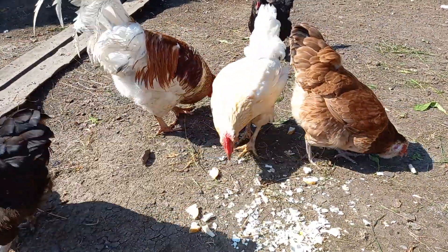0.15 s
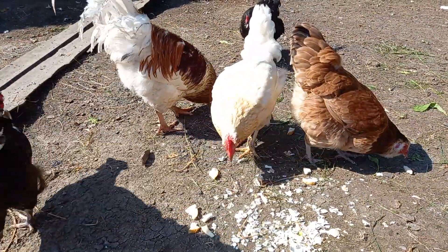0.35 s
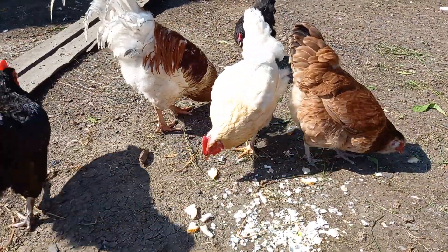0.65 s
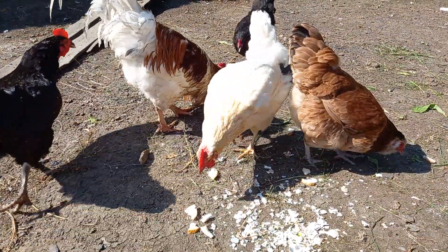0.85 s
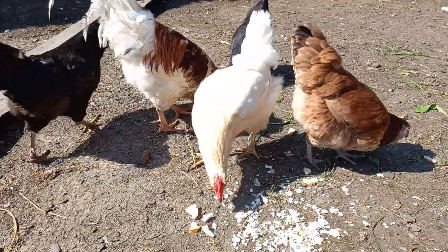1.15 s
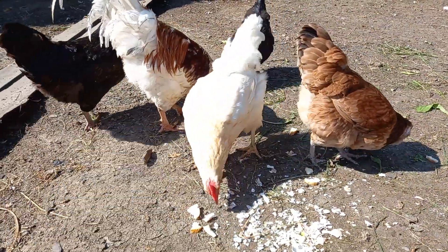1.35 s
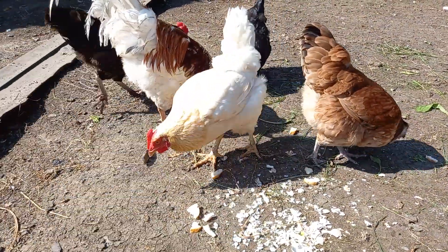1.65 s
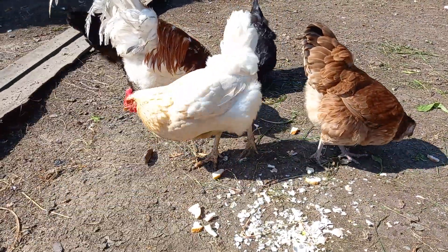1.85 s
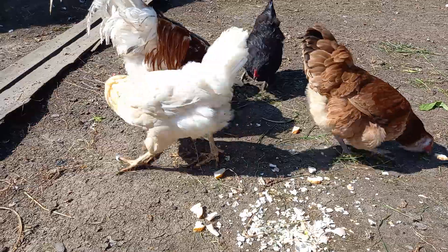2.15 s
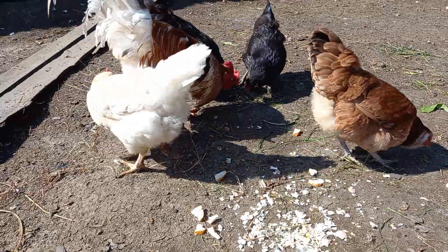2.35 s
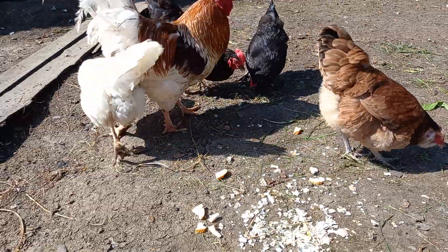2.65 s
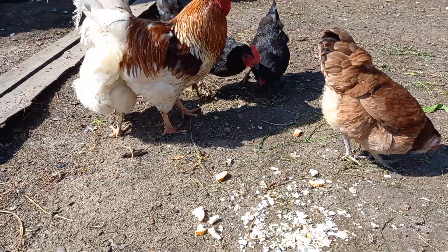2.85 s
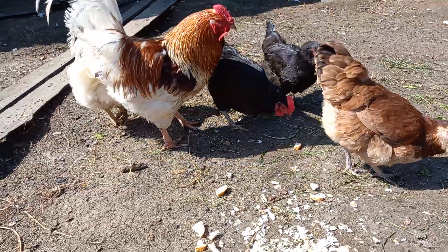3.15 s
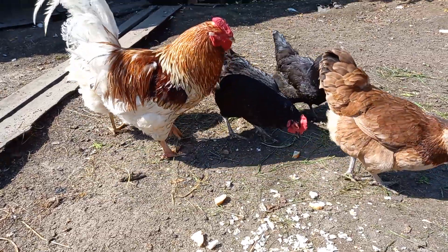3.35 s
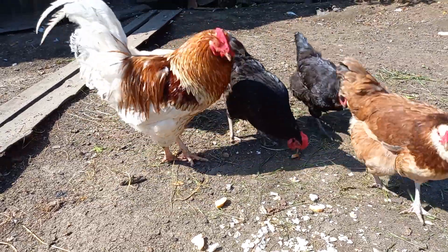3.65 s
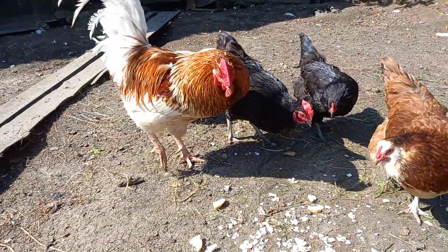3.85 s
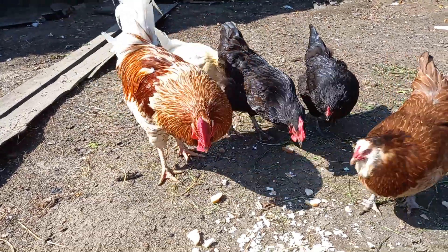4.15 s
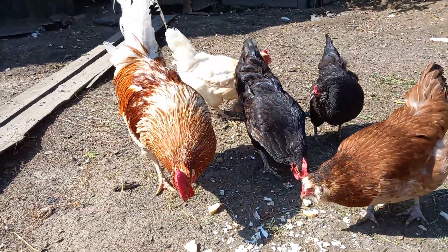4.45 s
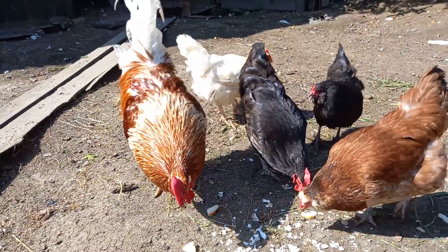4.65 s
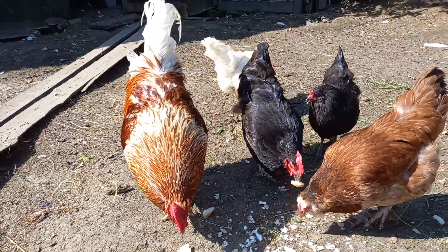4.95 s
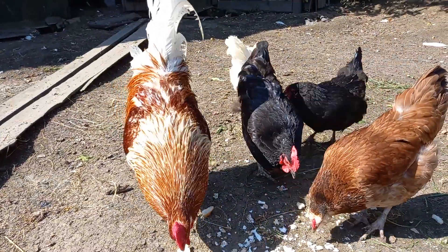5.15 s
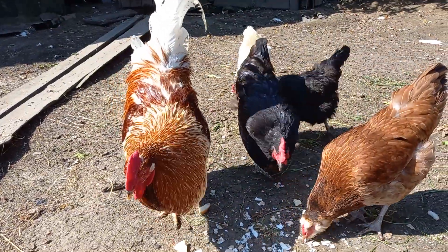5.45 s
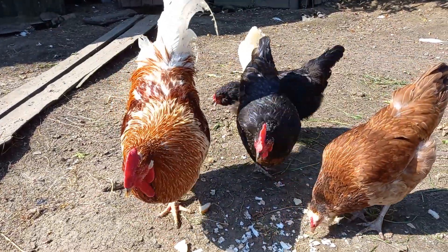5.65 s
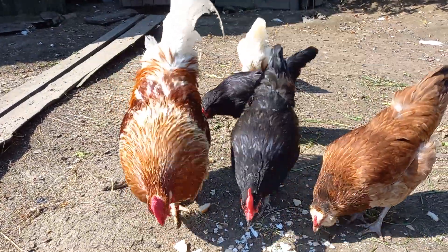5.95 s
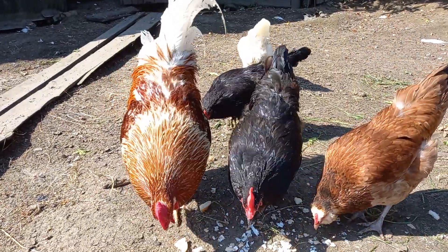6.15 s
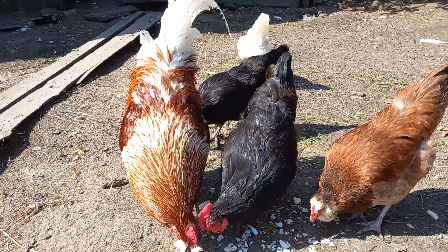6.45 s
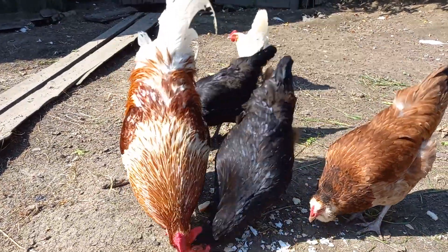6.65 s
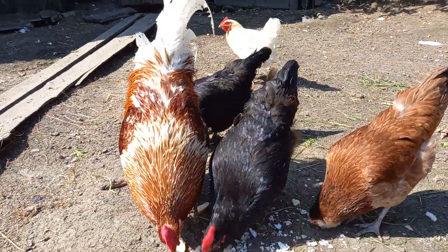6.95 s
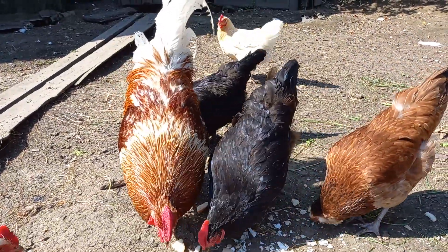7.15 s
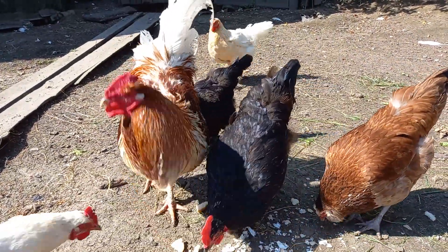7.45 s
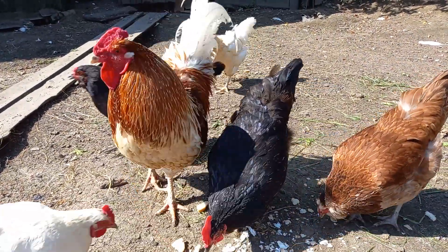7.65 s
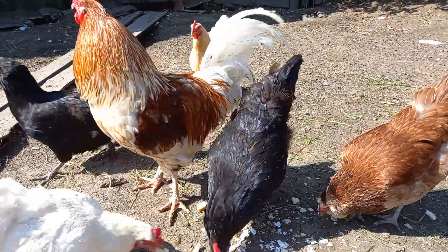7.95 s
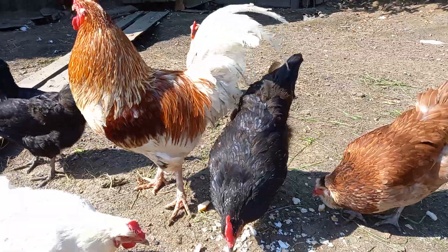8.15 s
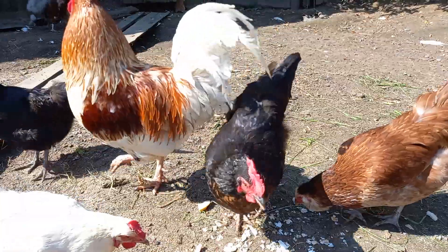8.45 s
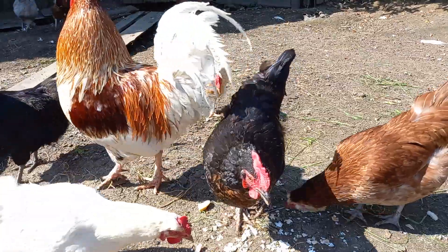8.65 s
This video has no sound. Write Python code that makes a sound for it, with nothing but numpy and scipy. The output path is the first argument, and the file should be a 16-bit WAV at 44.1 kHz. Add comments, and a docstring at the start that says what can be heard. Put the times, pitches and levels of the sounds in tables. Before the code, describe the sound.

Chickens feed close to the microphones in a quiet farmyard with a slight echo. Throughout, beaks tick irregularly on hard dirt and claws and feathers rustle softly over grit, while distant songbirds whistle faint, mostly falling notes. From 0.5 to 1.9 seconds a rooster gives five short, hollow, falling clucks. Around 3 seconds a hen makes three thin whines. The rooster clucks again from 3.3 to 6.6 seconds, about three times a second at first, among a few dull thuds. A nearby hen croons in a low, wavering voice from 4.2 to 4.6 seconds and again from 5.5 to 6.2. A gust of wind rumbles on the microphones from 7 to 7.9 seconds. At about 7.5 the rooster gives two quick, hoarse squawks, slightly to the left, then a rough, throbbing growl from 7.8 to 8.6 seconds, after which everything fades quickly.

```python
"""Rooster and hens in a farmyard

Close by, a rooster gives short hollow clucks (falling tones), two hoarse squawks (air through his
open throat) and a long throbbing growl. Hens croon with wavering voices and peck at crumbs on hard
dirt while claws scuff the grit. A songbird whistles far off, sheds and fences echo the birds,
and a gust of wind brushes the two spaced microphones."""
import sys
import numpy as np
from scipy import signal
from scipy.fft import rfft, irfft, next_fast_len
from scipy.io import wavfile
from scipy.ndimage import uniform_filter1d, map_coordinates

SR = 44100
rng = np.random.default_rng(int(sys.argv[2]) if len(sys.argv) > 2 else 0)


def wrap_up_sound(samples):
    """Save the sound to the file named by the first command line argument, as 16-bit audio."""
    columns = np.atleast_2d(samples).T
    # keep every value between -1 and 1, then stretch to whole-number steps
    tamed = np.clip(columns, -1, 1)
    steps = np.round(tamed * 32767).astype(np.int16)
    wavfile.write(sys.argv[1], SR, steps)


N = 388521

# rooster clucks (t/s, length/s, starting f/Hz, level/dB, overtone/dB, half pitch/dB, after-note/dB)
CLUCKS = [(0.528, 0.02, 497.3, -6.5, -28, -20.5, -17), (0.807, 0.032, 531.5, -5.5, -29.5, -21.5, -16.5),
          (1.161, 0.026, 500.5, -9.5, -26, -19, -8), (1.584, 0.026, 492.7, -8, -23.5, -18.5, -16.5),
          (1.867, 0.021, 477.4, -8, -26, -14, -14.5), (3.291, 0.014, 470, -10, -6, -5.5, -18.5),
          (3.725, 0.013, 509, -12, -11.5, -0.5, -15), (4.042, 0.019, 481, -8, -10, -45, -21),
          (4.39, 0.017, 482, -4, -10.5, -20, -38), (4.821, 0.02, 511, -7, -29, -9.5, -24),
          (5.095, 0.024, 504, -7, -34, -10, -26), (5.341, 0.033, 537.4, -6.5, -32, -22.5, -54),
          (6.297, 0.026, 490.5, -6, -38, -25, -29), (6.58, 0.026, 501.4, -5.5, -32, -15.5, -48)]
# rooster squawks (t/s, hold/s, level/dB, extra for the beak hiss/dB)
SQUAWKS = [(7.545, 0.021, -10, -17.5), (7.66, 0.037, -11, -11.5)]
# where his wide-open throat rings (f/Hz, width/Hz, level/dB)
THROAT_RINGS = [(553, 50, -10), (1180, 110, 13.5), (1670, 110, -2.5), (2500, 230, -10)]
# where his open beak rings (f/Hz, width/Hz, level/dB)
ROOSTER_BEAK_RINGS = [(4040, 610, 1), (5730, 120, -2), (11000, 1000, -16)]
# course of the growl (t/s, f/Hz, level/dB, roughness from 0 to 1, windpipe ring/dB)
GROWL = [(7.839, 363.4, -13.5, 0.09, -41), (7.92, 422.7, -18, 0.13, -65), (8.02, 466, -15.5, 0.47, -38),
         (8.129, 503.4, -17, 0.78, -21.5), (8.22, 517.4, -17, 0.74, -23.5), (8.319, 477.4, -15, 0.84, -33),
         (8.46, 495.6, -14.5, 0.98, -18.5), (8.58, 505.7, -16, 0.2, -24.5), (8.61, 420, -17.5, 0.2, -41),
         (8.645, 382, -17.5, 0.42, -54)]
# tone colour of the growl's breath (f/Hz, level/dB)
BREATH_COLOUR = [(900, -14), (1400, 1), (1750, -3), (2300, -2), (2650, -6), (2950, -2), (3600, -20),
                 (4700, -20), (5600, -14), (9000, -30)]
# how much louder the squawks and growl are on the left (f/Hz, left minus right/dB)
ROOSTER_PAN = [(400, 5.5), (800, -3), (1300, 8.5), (2200, 5.5), (8000, 2.5), (15000, 11)]
# how far their waves are ahead on the left (f/Hz, lead/radians)
ROOSTER_LEAD = [(300, 0.14), (780, 0.62), (1210, 3.43), (1550, 2.1), (2200, 1.07), (4900, 7.76),
                (8400, 13.6), (16000, 26)]
# near hen's long calls (beak opening/dB, roughness/dB, rows of (t/s, f/Hz, level/dB, low overtones/dB))
LONG_CALLS = [(-11.5, -17, [(4.188, 255, -30, -1.5), (4.204, 283.2, -22, 2.5), (4.256, 261.8, -25.5, -0.5),
              (4.296, 284.5, -28, 4), (4.37, 268.7, -21.5, 3), (4.43, 252, -24, -2.5),
              (4.465, 214, -21, -2), (4.475, 218, -46, -3)]), (-5.5, -25, [(5.565, 302, -48, 9),
              (5.61, 318.8, -35, 0.5), (5.654, 291.7, -27.5, -1), (5.69, 272.6, -22.5, -1.5),
              (5.72, 243.5, -25, -4.5), (5.78, 262.6, -22, -3), (5.855, 263.4, -18.5, -7.5),
              (5.884, 236, -26, -5), (5.897, 216, -45, -5)])]
# her short calls
# (t/s, length/s, first f/Hz, last f/Hz, level/dB, low overtones/dB, beak opening/dB, roughness/dB)
SHORT_CALLS = [(4.557, 0.0535, 306, 239.4, -24.5, 1, -14, -4.5),
               (5.517, 0.048, 262.3, 285, -28.5, 1, -14, -10),
               (6.006, 0.062, 271.6, 291.4, -20, -2.5, -0.5, -14),
               (6.165, 0.067, 325, 282, -26.5, 3, -3.5, -7.5)]
# where her open beak rings (f/Hz, width/Hz, boost/dB)
HEN_BEAK_RINGS = [(1723, 67, 12.5), (2525, 146, 16)]
# thin-voiced hen, one list for each call (t/s, f/Hz, level/dB)
WHINES = [
    [(2.883, 490, -37), (2.9, 391, -35), (2.92, 399, -45), (2.95, 382, -57)],
    [(3.05, 730, -31), (3.08, 783, -37), (3.11, 526, -29.5), (3.165, 518, -31), (3.185, 554, -44),
     (3.24, 496, -49)],
    [(3.285, 466, -21), (3.3, 407, -25.5), (3.33, 413, -42), (3.375, 432, -38.5)],
]
# beaks and claws hitting grit (t/s, level/dB, extra for the duller body of the tick/dB)
PECKS = [(0.0283, -29.5, -4), (0.11, -30, -8), (0.395, -35, 2.5), (0.5696, -24.5, -9.5),
         (0.6938, -26.5, -8), (1.132, -18.5, -18), (1.4287, -37, -23), (1.588, -27, -28), (1.885, -31, -14),
         (2.1736, -16.5, -10.5), (2.211, -25, -24.5), (2.2216, -25, -38), (2.24, -23.5, -32),
         (2.3433, -24.5, -20), (2.6449, -28, -15), (3.6971, -19, -4), (3.7116, -16, -3), (3.732, -20, -1),
         (4.4358, -32.5, 9.5), (4.8465, -24.5, -10), (4.8652, -27, -2), (4.9194, -30, -20),
         (5.2515, -25.5, -11.5), (5.276, -25, -16.5), (5.987, -27.5, -31), (6.746, -33.5, -3.5),
         (6.8537, -17.5, -27), (6.8805, -19.5, -12.5), (6.995, -32.5, -13), (7.0537, -13, -9.5),
         (7.2568, -24, -20.5), (7.31, -23, -10.5), (7.4644, -19, -13.5), (7.874, -25, -0.5)]
# short, dull, low thuds: knocks on the dirt, and the low half-pitch tails of two rooster clucks
# (t/s, level/dB, f/Hz)
THUDS = [(0.148, -34, 473), (3.042, -26, 500), (3.734, -12.5, 266), (4.058, -14, 273), (4.443, -19.5, 131),
         (5.222, -23, 145), (5.923, -30, 328), (6.077, -20.5, 268), (6.248, -28, 307),
         (7.048, -25.5, 141.5)]
# feet and feathers moving over the grit (t/s, level/dB)
SHUFFLE = [(0.1, -50), (0.8, -48), (1.3, -56), (2, -56), (2.25, -47.5), (2.6, -56.5), (3.3, -50),
           (4.2, -47), (4.65, -61), (5.2, -59), (5.8, -48.5), (6.5, -58.5), (7, -45), (7.7, -39),
           (8.3, -49.5)]
# tone colour of grit (f/Hz, level/dB)
GRIT_COLOUR = [(2000, -26), (4500, -5.5), (7500, -10), (10500, -0.5), (14000, -0.5), (15700, -4),
               (16100, -40), (17000, -24)]
# tone colour of straw and feathers (f/Hz, level/dB)
STRAW_COLOUR = [(300, 4), (700, 3.5), (1500, -8), (3500, -7), (6000, -18), (9000, -18)]
# songbird notes (t/s, length/s, first f/Hz, last f/Hz, bend: 1 straight or 4 held then steep, level/dB)
SONG = [(0.029, 0.17, 4850, 3160, 3.9, -44), (.34, 0.11, 3050, 4110, 3.3, -50.5),
        (0.508, 0.074, 3970, 3890, 0.84, -49), (.64, .14, 4800, 4160, 0.92, -47.5),
        (0.719, 0.16, 3920, 3010, 1.1, -48.5), (.9, 0.16, 4930, 2840, 3.7, -49.5),
        (1.039, 0.09, 4600, 2450, 3.9, -48), (1.158, .15, 4980, 2600, 4, -49),
        (1.47, 0.16, 4890, 2590, 4, -45), (1.83, 0.16, 3800, 2580, 3.2, -63.5),
        (2.01, 0.066, 3500, 2900, 1.2, -56.5), (2.25, 0.041, 3000, 2400, 1, -51),
        (2.44, 0.062, 3300, 3780, 1.4, -52.5), (2.66, 0.115, 3760, 3730, 0.81, -63),
        (3, 0.14, 4030, 2470, 2.8, -60), (3.201, 0.18, 4070, 3140, 0.98, -56),
        (3.5, 0.1, 4020, 2530, 2.5, -59), (4.08, 0.037, 2890, 2690, 1.4, -40.5),
        (4.239, .08, 3950, 3060, 0.92, -53), (4.499, 0.043, 3320, 3130, 1.2, -47.5),
        (5.02, 0.039, 3093, 3126, 1.2, -48), (5.22, 0.086, 3660, 4280, 0.65, -58.5),
        (5.35, 0.15, 4420, 5450, 2.5, -53), (5.55, 0.11, 3050, 4100, 2.9, -50),
        (5.701, 0.11, 4110, 3800, .3, -49), (5.911, .2, 4060, 2863, 1.26, -48)]
# strength of the wind (t/s, level/dB)
GUST = [(0.1, -48), (1.4, -49), (3.3, -48.5), (4.6, -45.5), (6.8, -51), (6.95, -39), (7.3, -29),
        (7.8, -29.5), (7.95, -54.5), (8.7, -56)]
# tone colour of the wind's rumble (f/Hz, level/dB)
RUMBLE_COLOUR = [(25, -20), (50, -15.5), (80, 4), (140, -1), (250, -2.5), (500, -39)]
# tone colour of the yard at rest (f/Hz, level/dB)
HUSH_COLOUR = [(35, -20), (60, -1.5), (323, 0), (1340, -17.5), (3760, -22.5), (8320, -33), (11500, -21.5),
               (16000, -40.5)]
# how long the yard's echo takes to fade by 60 dB (f/Hz, t/s)
ECHO_TIMES = [(200, 0.38), (500, 0.24), (1300, 0.21), (4000, 0.24), (10000, 0.047)]


def rooster_clucks():
    """Each cluck is a falling, almost pure tone with a hard start; a weaker after-note trails it."""
    fall_hz_per_s = 3020
    out, t = np.zeros(N + SR), np.arange(SR // 8) / SR
    flutter = wobble(90)
    puff = filtered(rng.standard_normal(N), rings([(736, 108, 24.3), (1885, 190, 5)]))
    beak_breath = unit(filtered(rng.standard_normal(N), rings([(2640, 620, 5), (4730, 990, -3.5)])))
    for s, length, first_hz, db, over_db, half_db, after_db in CLUCKS:
        start = round(s * SR - 90)
        span = slice(start, start + len(t))
        last_hz = first_hz - fall_hz_per_s * length
        hz = np.interp(t, [0, .006, length, length + .074],
                       [1.286 * first_hz, first_hz, .981 * last_hz, 1.093 * last_hz])
        phase = phase_of(hz)
        main_times = [0, .005, .011, length, length + .004, length + .009]
        after_times = [length, length + .004, length + .026, length + .034, .12]
        main = amp(np.interp(t, main_times, [-24, -5, 0, -3, -14, -60]))
        after = amp(after_db + np.interp(t, after_times, [-32, 7, 4.5, -13, -34.5]))
        voice = main * (np.sin(phase) + amp(over_db - 2 - 9 * t / length) * np.sin(2 * phase + 1))
        voice += after * np.sin(phase + 2.2)  # the voice membrane restarts out of step
        late = np.clip(t / length, 0, 1) ** 2  # every second cycle weakens as the note ends
        voice += amp(half_db) * late * (main + .58 * after) * np.sin(phase / 2)
        voice += main * (amp(-3.5 + .87 * over_db) * puff[span] + amp(-35.5) * beak_breath[span])
        out[span] += amp(db + flutter[span]) * voice
    return out[:N]


def rooster_squawks():
    """Ragged bursts of air rush through the wide-open throat and beak."""
    out = np.zeros(N)
    air = rng.standard_normal((2, N)) * amp(1.2 * wobble(300))
    throat = unit(filtered(air[0], rings(THROAT_RINGS)))
    beak = unit(filtered(air[1], rings(ROOSTER_BEAK_RINGS)))
    for s, hold, db, hiss_db in SQUAWKS:
        span, (swell_db, gate) = call_curves(swell(s, rise_s=.013, hold_s=hold, fall_s=.029))
        out[span] += gate * amp(db + swell_db) * (throat[span] + amp(hiss_db) * beak[span])
    return out


def rooster_growl():
    """An uneven throb chops up the voice, along with its rasp, windpipe ring and hoarse breath."""
    throb_hz, burst_db, burst_s = 56, 10.5, .0067
    hz, db, roughness, ring_db, _ = curves(GROWL)
    start, end = GROWL[0][0], GROWL[-1][0]
    swell_db, gate = curves(swell(start, rise_s=.033, hold_s=end - start, fall_s=.041))
    beat = phase_of(throb_hz * (1 + .32 * wobble(22)))
    throb = unit((.56 + .5 * np.cos(beat)) ** 1.2 * amp(2.2 * wobble(40)))
    phase = phase_of(hz * (1 + .02 * wobble(150)))
    # as the voice roughens, its overtone gives way to the low tone and the rasp
    low_tone = amp(db - 2.5) * roughness * (.58 + .098 * throb) * np.sin(phase)
    overtone = amp(db) * np.sqrt(1 - roughness) * (.43 + .73 * throb) * np.sin(2 * phase)
    blip = np.sin(phase_of(1.22 * hz * (1 + .084 * np.sin(beat) + .0605 * wobble(60))))  # rises each throb
    rasp = np.sqrt(roughness) * unit(throb * (blip + .4 * noise_band(1.65 * hz, 380)))
    windpipe = noise_band(np.clip(4.05 * hz, 1900, 2030), 150) + amp(-19) * noise_band(3050, 244)
    ring = amp(ring_db) * unit((.83 + .31 * throb) * windpipe)
    breath = unit((1.5 + throb) * coloured(rng.standard_normal(N), BREATH_COLOUR))
    burst = np.exp(-np.abs(np.arange(N) / SR - start) / burst_s)  # extra breath as the growl breaks out
    breath *= amp(-16.5 + burst_db * burst)
    return gate * amp(swell_db) * (np.sqrt(2) * (low_tone + overtone) + amp(db) * (rasp + breath) + ring)


def hen_croon():
    """The near hen's voice pulses at a wavering pitch; its upper overtones grow as her beak opens."""
    muffle_above_hz = 1157
    out, multiple = np.zeros(N), np.arange(2, 12)[:, None]  # overtones are multiples of the pitch
    waver = .017 * wobble(120) + .0131 * wobble(35)
    flutter = wobble(60)
    breath, rasp = noise_band(2100, 1780), noise_band(750, 540)
    drift = np.array([wobble(45) for _ in multiple])
    for open_db, rough_db, rows in LONG_CALLS + short_hen_calls():
        span, (hz, db, low_db, gate) = call_curves(rows)
        phase, overtone_hz = phase_of(hz * (1 + waver[span])), multiple * hz
        upper = np.clip((overtone_hz - 880) / 120, 0, 1)  # 1 above the throat's lowest ring
        muffled = np.clip((overtone_hz - muffle_above_hz) / 150, 0, 1)
        ring_db = sum(boost_db / (1 + ((overtone_hz - centre) / width) ** 2)
                      for centre, width, boost_db in HEN_BEAK_RINGS)
        low_gains = (1 - upper) * amp(low_db - 4 * (multiple - 2))
        high_gains = upper * amp(-16 - 6 * (multiple - 4.5) + open_db * muffled + ring_db)
        gains = (low_gains + high_gains) * amp(3 * drift[:, span])
        voice = np.cos(phase) + np.sum(gains * np.cos(multiple * (phase - .61)), axis=0)
        air = amp(open_db - 37) * breath[span] + amp(rough_db) * rasp[span]
        voice += (1 + np.cos(phase)) * air  # air escapes once a cycle
        out[span] += np.sqrt(2) * gate * amp(db + .57 * flutter[span]) * voice
    return out


def short_hen_calls():
    """Her short calls, laid out like LONG_CALLS: the pitch slides while the level swells and fades."""
    calls = []
    for s, length, first_hz, last_hz, db, low_db, open_db, rough_db in SHORT_CALLS:
        rise, hold, fall = .2 * length, .57 * length, .23 * length
        rows = [(t, first_hz + (last_hz - first_hz) * (t - s) / length, db + swell_db, low_db)
                for t, swell_db in swell(s + rise, rise, hold, fall, edge_db=-21.5)]
        calls.append((open_db, rough_db, rows))
    return calls


def hen_whine():
    """A thin, whistle-like voice; its overtones lead at low pitch and fade as the pitch climbs."""
    fade_above_hz, fade_db_per_hz = 413, .47
    out, waver, flutter = np.zeros(N), wobble(100), wobble(70)
    for rows in WHINES:
        span, (hz, db, gate) = call_curves(rows)
        over_db = db + 10.5 - fade_db_per_hz * np.clip(hz - fade_above_hz, 0, None)
        phase = phase_of(hz * (1 + .0454 * waver[span]))
        tone = amp(db) * np.sin(phase) + amp(over_db) * (np.sin(2 * phase) + amp(-27) * np.sin(3 * phase))
        out[span] += np.sqrt(2) * gate * amp(2.5 * flutter[span]) * tone
    return out


def pecks():
    """A beak or claw makes a sharp tick inside a short scuff of grit, which lasts longer when loud."""
    bright, body = np.zeros((2, 2, N + SR))
    t = np.arange(SR // 16) / SR - .006
    for s, db, body_db in PECKS:
        shared_noise, side_noise, chance = rng.standard_normal((3, len(t)))
        lag_samples, pan_db = 8 * chance[0], 2 + 3 * chance[1]  # each peck has its own place
        scuff = np.exp(-np.abs(t) / np.where(t < 0, .0015, .0094 + .0033 * amp(db + 6)))
        grains = amp(8.8 * uniform_filter1d(chance, size=15))
        shape = np.exp(-np.abs(t) / .00027) + .3 * scuff * grains
        for side, sign in enumerate([1, -1]):
            start = round((s + t[0]) * SR + sign * lag_samples)
            tick = amp(db + sign * pan_db / 2) * shape * (shared_noise + .18 * sign * side_noise)
            bright[side, start:start + len(t)] += tick
            body[side, start:start + len(t)] += amp(body_db) * tick
    bright = amp(4.5) * coloured(bright[:, :N], GRIT_COLOUR)
    return bright + filtered(body[:, :N], rings([(1680, 2200, 13), (3270, 2600, 7.8)]))


def thuds_and_gulps():
    """A dull, low thud rings for a cycle or two; the rooster's soft gulp before each cluck sounds alike."""
    gulp_ahead_s = .056
    out, t, gulps = np.zeros(N + SR), np.arange(SR // 16) / SR, []
    for s, _, hz, db, *_ in CLUCKS:
        size, coin = rng.standard_normal(2)
        gulps.append((s - gulp_ahead_s, db - 23.5 + 3 * size, hz / 2 if coin > 0 else hz))
    for s, db, hz in THUDS + gulps:
        start, cycles = round(s * SR - 40), t * hz
        shape = np.exp(-cycles / 1.25) * (1 - np.exp(-cycles / .46))
        out[start:start + len(t)] += amp(db + 9) * shape * np.sin(2 * np.pi * cycles)
    return out[:N]


def shuffle():
    """Feet push clumps of grit that fizz and crackle; straw and feathers rustle along."""
    snaps_per_s = 60
    fizz_db, _ = curves(SHUFFLE)
    clump = wobble(11)
    snaps = (rng.random(N) < snaps_per_s / SR) * rng.exponential(2.9, N)
    crackle = 1 + signal.fftconvolve(snaps, np.exp(-np.abs(np.arange(-200, 201)) / 35), "same")
    fizz = unit(amp(2.5 * clump) * crackle * stereo_noise(GRIT_COLOUR, alike=.15))
    rustle = unit(amp(2 * clump + 2.5 * wobble(30)) * stereo_noise(STRAW_COLOUR, alike=.1))
    return amp(fizz_db + np.array([[1.2], [-1.2]])) * fizz + amp(-54 + 1.2 * (fizz_db + 55.5)) * rustle


def songbirds():
    """Gliding whistles that fray and swell the farther they slide; a far wall repeats them faintly."""
    edge_s, rest_s = .012, .014  # fade at both ends of a note; time spent on its last pitch
    wall_s, wall_db = .11, -16.5
    out, flutter, fray = np.zeros(N), wobble(80), wobble(200)
    for s, length, first_hz, last_hz, bend, db in SONG + twitter_notes():
        span = slice(round(s * SR), round((s + length) * SR))
        t = np.arange(span.stop - span.start) / SR
        hz = first_hz + (last_hz - first_hz) * np.clip(t / (length - rest_s), 0, 1) ** bend
        octaves = np.abs(np.log2(hz / first_hz))
        whistle = np.sqrt(2) * np.sin(phase_of(hz * (1 + (.0078 + .025 * octaves) * fray[span])))
        gate = np.clip(np.minimum(t, length - t) / edge_s, 0, 1)
        out[span] += gate * amp(db + 3.5 * octaves + 2.9 * flutter[span]) * whistle
    return out + amp(wall_db) * np.roll(out, round(wall_s * SR))


def twitter_notes(count=55, typical_hz=3690):
    """Rows like SONG for birds farther off: faint, mostly falling notes at random until the growl."""
    times, chances = rng.uniform(0, GROWL[0][0], count), rng.standard_normal((count, 3))
    notes = []
    for s, (pitch, slide, size) in zip(times, chances):
        first_hz = typical_hz * np.exp(.12 * pitch)
        notes.append((s, .07, first_hz, first_hz * np.exp(.11 * slide - .12), 1.5, -61.5 + 1.9 * size))
    return notes


def wind():
    """Air brushing the microphones makes a lumpy rumble that swells with the gust."""
    gust_db, _ = curves(GUST)
    rumble = unit(amp(5.5 * wobble(13)) * stereo_noise(RUMBLE_COLOUR, alike=.73))
    return amp(gust_db + np.array([[1], [-1]])) * rumble


def yard_hush():
    """The soft, steady noise of the yard at rest."""
    return amp(-46.5) * stereo_noise(HUSH_COLOUR, alike=.099)


def yard_echo(x, delay_samples):
    """Sheds and fences throw the sound back; each frequency dies away at its own speed."""
    hz, t, noise = signal.stft(rng.standard_normal((2, SR // 2)), SR, nperseg=256)
    tail = signal.istft(noise * amp(-60 * t / value_at(ECHO_TIMES, hz)[:, None]), SR, nperseg=256)[1]
    delayed = np.pad(x, (delay_samples, 0))[None]
    return signal.fftconvolve(delayed, tail / np.linalg.norm(tail[0]), axes=1)[:, :N]


def amp(db):
    """Turn decibels into a number to multiply by."""
    return 10 ** (np.asarray(db) / 20)


def unit(x):
    """Scale x to an average strength (rms) of 1."""
    return x / np.sqrt(np.mean(x ** 2) + 1e-20)


def phase_of(hz):
    """How far a wave of changing pitch has turned at each sample, in radians."""
    return 2 * np.pi * np.cumsum(hz) / SR


def value_at(table, hz):
    """Read between the rows of an (f/Hz, value) table, with octaves evenly spaced."""
    table_hz, values = np.transpose(table)
    return np.interp(np.log(hz + 1), np.log(table_hz + 1), values)


def curves(rows, edge_s=.0039):
    """Each column as a value per sample, plus a gate that is open from the first row to the last."""
    times, *columns = np.transpose(rows)
    t = np.arange(N) / SR
    gate = np.clip(np.minimum(t - times[0], times[-1] - t) / edge_s, 0, 1)
    return [np.interp(t, times, column) for column in columns] + [gate]


def call_curves(rows):
    """The samples that one call covers, and its curves over that stretch."""
    span = slice(round(rows[0][0] * SR), round(rows[-1][0] * SR))
    return span, [curve[span] for curve in curves(rows)]


def swell(s, rise_s, hold_s, fall_s, edge_db=-30):
    """Rows (t/s, level/dB) that rise to full level at time s, hold and fall."""
    return [(s - rise_s, edge_db), (s, 0), (s + hold_s, 0), (s + hold_s + fall_s, edge_db)]


def wobble(per_s):
    """A smooth curve through per_s random values a second."""
    return map_coordinates(rng.standard_normal(int(N * per_s / SR) + 4), [np.arange(N) * per_s / SR])


def filtered(x, response):
    """Scale and shift each frequency in x by response(hz)."""
    size = next_fast_len(N + SR // 2)
    return irfft(rfft(x, size) * response(np.fft.rfftfreq(size, 1 / SR)), size)[..., :N]


def coloured(x, colour):
    """Give x the tone colour of an (f/Hz, level/dB) table."""
    return filtered(x, lambda hz: amp(value_at(colour, hz)))


def rings(table):
    """A filter response that rings at each row (f/Hz, width/Hz, level/dB)."""
    return lambda hz: sum((-1) ** k * amp(db) * 1j * hz * width / (centre ** 2 - hz ** 2 + 1j * hz * width)
                          for k, (centre, width, db) in enumerate(table))


def noise_band(hz, width_hz):
    """Noise in a band around hz, which may be steady or moving."""
    slow = filtered(rng.standard_normal((2, N)), lambda f: 1 / (1 + (2 * f / width_hz) ** 4))
    phase = phase_of(np.broadcast_to(hz, N))
    return unit(slow[0] * np.cos(phase) + slow[1] * np.sin(phase))


def stereo_noise(colour, alike):
    """Left and right noise; alike runs from 0 (unrelated) to 1 (the same)."""
    angle = np.arccos(alike) / 2
    shared, apart = np.cos(angle) * rng.standard_normal(N), np.sin(angle) * rng.standard_normal(N)
    return unit(coloured(np.array([shared + apart, shared - apart]), colour))


def placed(x, pan, lead):
    """Set x between the microphones: the left is louder by pan (f/Hz, dB), ahead by lead (f/Hz, radians)."""
    side = np.array([[.5], [-.5]])
    return filtered(x, lambda hz: amp(side * value_at(pan, hz)) * np.exp(1j * side * value_at(lead, hz)))


def scene():
    """All the birds in their places, with the yard's echo, the grit and the wind."""
    clucks = rooster_clucks()
    hens = hen_croon() + hen_whine()
    thuds = thuds_and_gulps()
    cries = rooster_squawks() + rooster_growl()
    song = songbirds()
    near = placed(clucks + thuds, pan=[(450, 1.5)], lead=[(100, .03), (450, .05), (4000, 2.2)])
    near += placed(hens, pan=[(260, .51), (800, .83), (1100, -1.1)],
                   lead=[(260, .17), (800, -.58), (1100, .77)])
    near += placed(cries, ROOSTER_PAN, ROOSTER_LEAD)
    far = placed(song, pan=[(4000, 4.5)], lead=[(2500, -7), (5500, -15.5)])
    far += amp(-2.5) * yard_echo(song, delay_samples=0)
    echo = yard_echo(amp(-19) * clucks + amp(-20.5) * hens + amp(-15.5) * cries, delay_samples=700)
    return near + far + echo + pecks() + shuffle() + wind() + yard_hush()


def record(dry):
    """Round off the loudest peaks, fade the end, and cut the deepest bass and the highest treble."""
    ceiling, bass_hz, top_hz = .82, 48, 16900
    fade_start_s, fade_db_per_s = 8.62, 91
    rounded = dry / (1 + np.abs(dry / ceiling) ** 6) ** (1 / 6)
    fade = amp(-fade_db_per_s * np.clip(np.arange(N) / SR - fade_start_s, 0, None))
    return filtered(rounded * fade, lambda hz: (hz < top_hz) / (1 + (bass_hz / (hz + 1)) ** 4))


dry = scene()
out = record(dry)
wrap_up_sound(out)
```